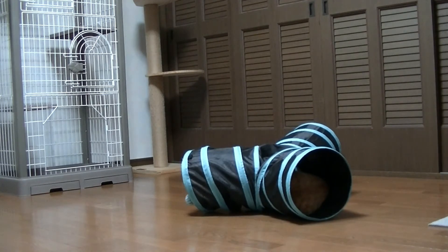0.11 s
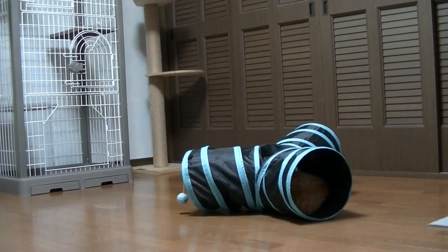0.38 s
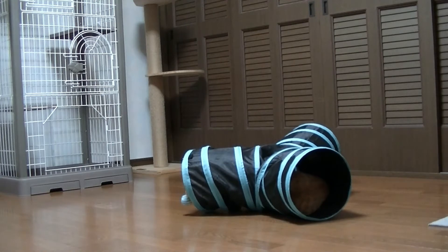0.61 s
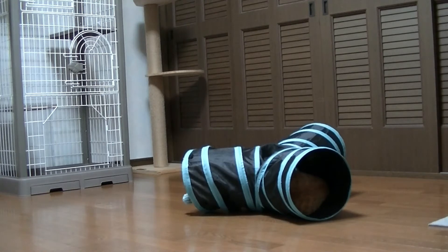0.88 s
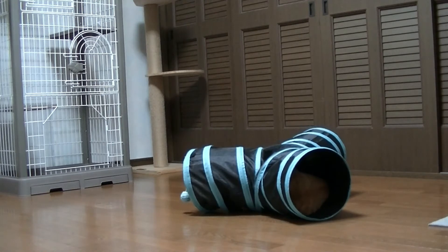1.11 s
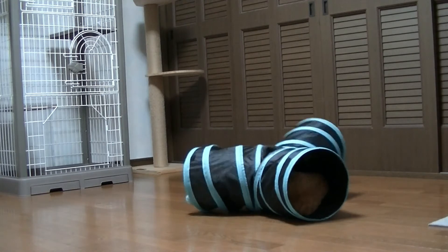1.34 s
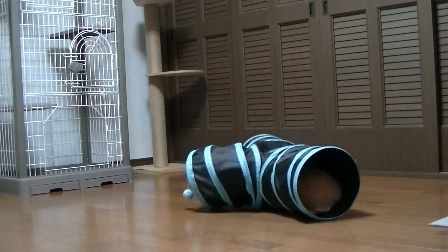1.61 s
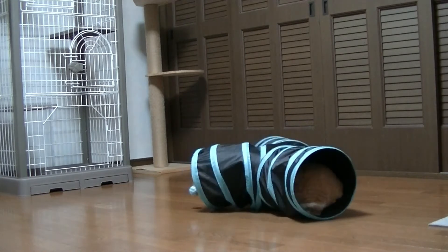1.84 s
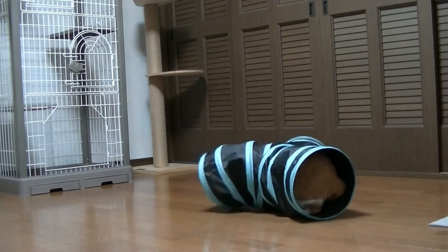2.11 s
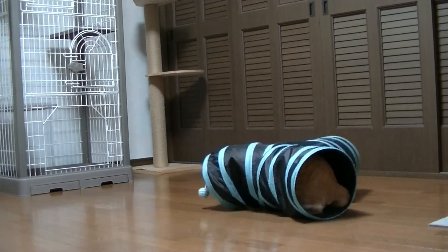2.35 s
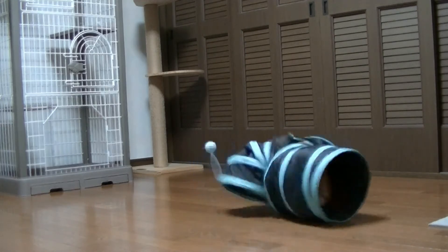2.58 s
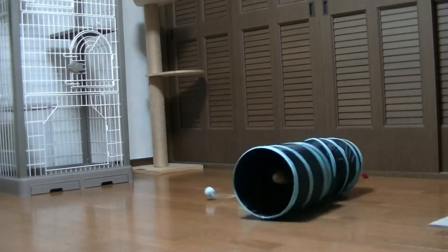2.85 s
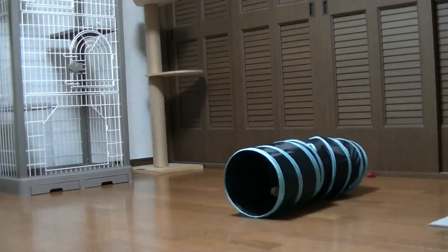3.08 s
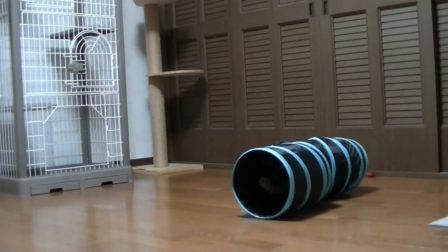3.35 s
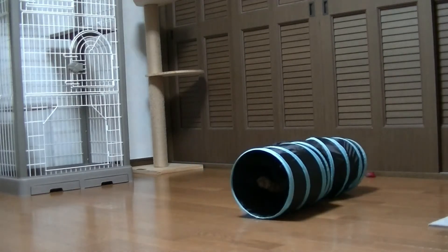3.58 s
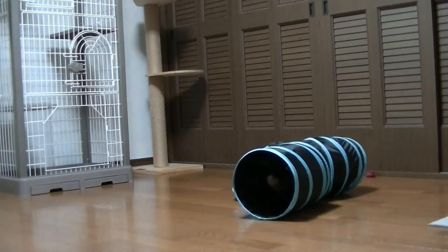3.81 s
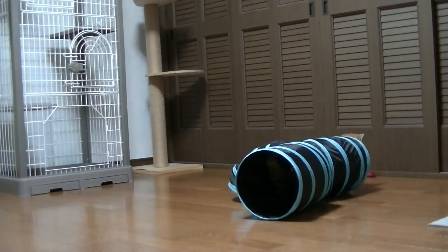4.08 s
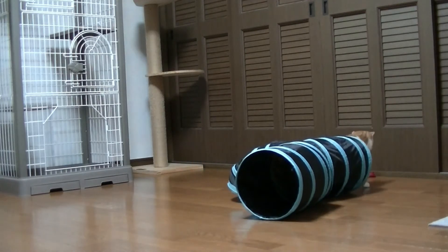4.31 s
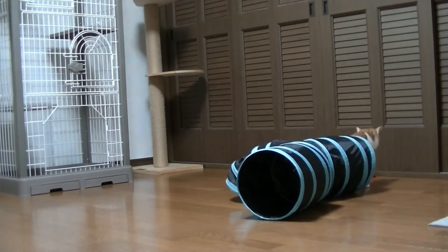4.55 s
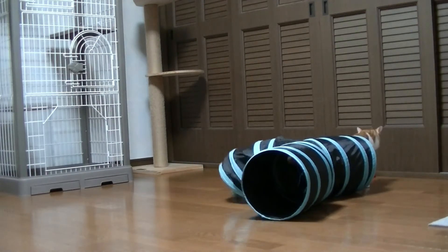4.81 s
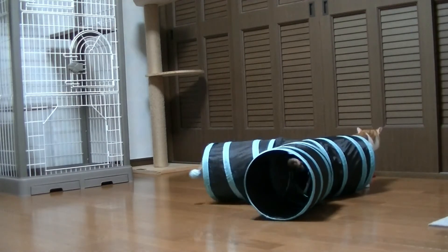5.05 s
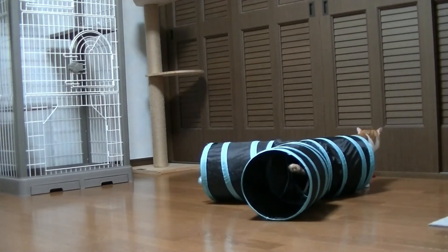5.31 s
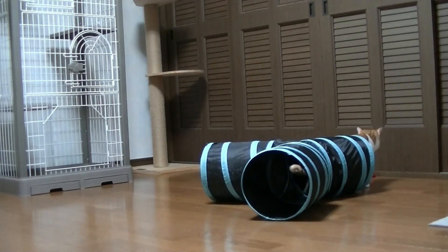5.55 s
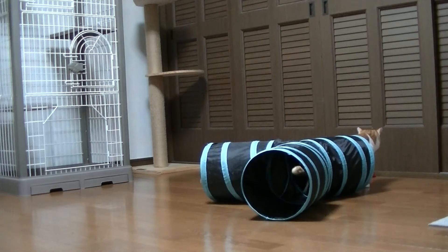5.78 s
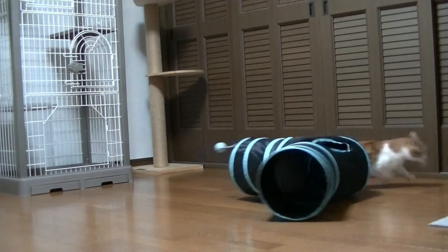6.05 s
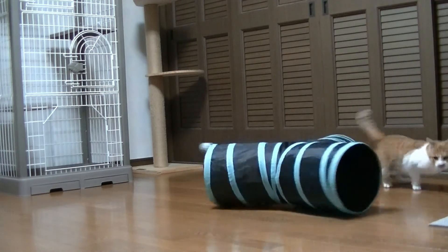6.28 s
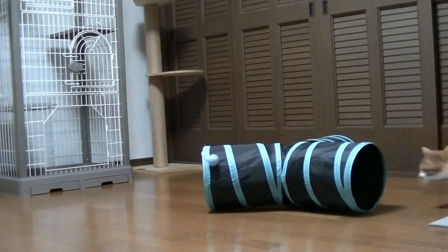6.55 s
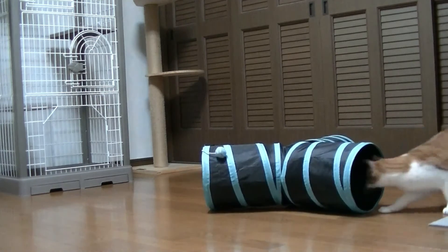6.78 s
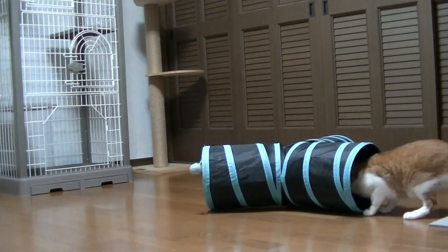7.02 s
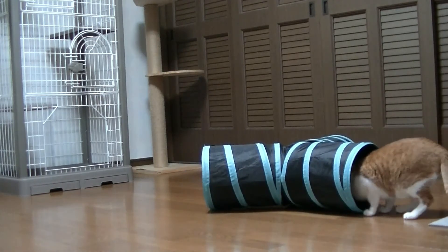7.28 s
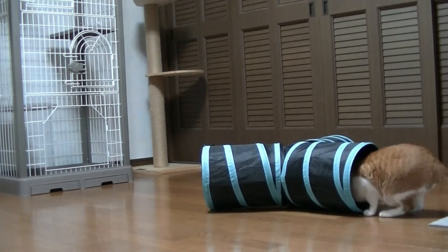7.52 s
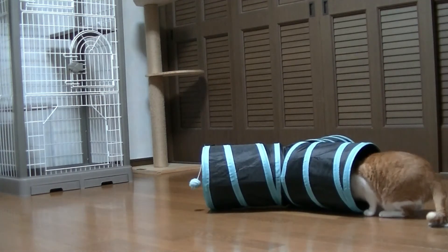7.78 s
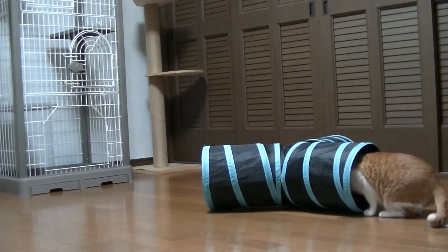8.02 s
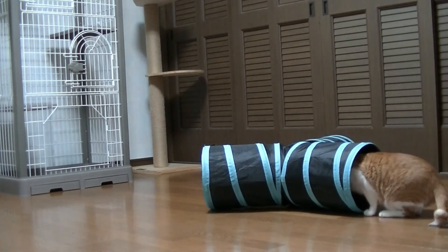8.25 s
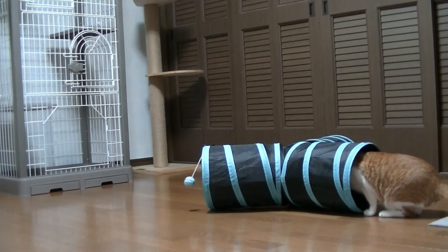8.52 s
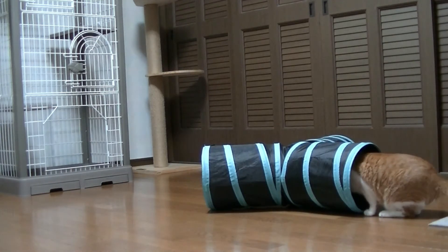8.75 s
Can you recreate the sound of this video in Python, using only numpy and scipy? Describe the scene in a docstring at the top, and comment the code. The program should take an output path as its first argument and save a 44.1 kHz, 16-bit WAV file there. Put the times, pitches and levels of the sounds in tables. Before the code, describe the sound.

A crinkly nylon tunnel rustles and scrapes over a wooden floor as a cat scrambles inside, with hard knocks, then faint ticks and quiet.

```python
"""Crinkling cloth comes first: a cat scrambles in a nylon play tunnel and shoves it over a wooden floor.
Many tiny random slips make the cloth hiss, the hoops scrape and the wall drum; short sine ticks are snapping creases.
Fading sine waves make the knocks and thumps on the boards, and a tiny bell that shimmers faintly as the cat walks.
A bare, lively room answers with tails of fading noise, over steady hiss and a low hum.
Two microphones listen from floor height."""
import sys
import numpy as np
from scipy import signal
from scipy.fft import rfft, irfft, next_fast_len
from scipy.io import wavfile
from scipy.ndimage import uniform_filter1d, minimum_filter1d, map_coordinates

SR = 44100
rng = np.random.default_rng(int(sys.argv[2]) if len(sys.argv) > 2 else 0)


def volts_from_decibels(level):
    """Turn decibel levels (scalar or array-like) into linear amplitude factors."""
    exponent = np.asarray(level, float) / 20
    return 10 ** exponent


def transcribe(signal):
    """Save signal, clipped to [-1, 1], as a 16-bit WAV file at the path in sys.argv[1]."""
    frames = np.atleast_2d(signal).T
    limited = np.clip(frames, -1, 1)
    pcm = np.round(limited * 32767).astype(np.int16)
    wavfile.write(sys.argv[1], SR, pcm)


N = 391608  # length in samples

# Tone of crisp crackles. Each row: pitch in Hz, relative level in dB.
CRISP_TONE = [(3500, -43.5), (5200, 4), (6000, 6.5), (8500, 3), (11000, -6.5), (15500, -26)]
# Tone of dull patter and cracks. Each row: pitch in Hz, relative level in dB.
DULL_TONE = [(700, -42.5), (1700, -2), (2300, 1), (3500, 1), (5000, -22.5)]
# How alike left and right are for the wide tunnel and the room. Each row: pitch in Hz, likeness (1 = the same).
WIDE_ALIKE = [(60, 0.99), (150, 0.99), (380, 0.98), (950, 0.95), (2380, 0.93), (5980, 0.69), (15000, 0.11)]
# Hoops and paws knocking the boards. Each row: start in seconds, level in dB before the modes' own levels,
# pitch that rings most in Hz, loss away from that pitch in dB per octave.
BLOWS = [(.37, -46, 990, 13), (.846, -47, 200, 16), (1.352, -38.5, 200, 2.5), (1.376, -30.5, 1605, 3.5),
         (1.408, -30.5, 697, -2), (1.624, -29, 800, 0.6), (2.455, -26, 600, 1.5), (2.614, -23, 252, 6.5),
         (2.7543, -9, 1300, 8), (2.778, -15, 900, 5), (2.809, -22, 752, 14), (2.843, -37, 1123, 17.5),
         (2.924, -20.5, 1290, 3), (3.972, -34, 2000, 10), (5.057, -32, 663, 4), (5.095, -48, 500, 8),
         (5.99, -31, 160, 5.5), (6.031, -22.5, 160, 6), (6.095, -27.5, 160, 2), (6.313, -18, 616, 7.5),
         (6.579, -36.5, 220, 2.5), (6.706, -37, 2300, 9), (6.862, -50, 800, 12), (6.875, -37.5, 810, 12),
         (6.885, -50, 1750, 14), (6.894, -39, 690, 19), (6.934, -44.5, 700, 5), (7.065, -43.5, 1600, 5.5),
         (7.095, -44, 1800, 13), (7.366, -45, 400, 4), (7.828, -58, 697, 7), (7.908, -48, 880, 15),
         (7.928, -50, 764, 22), (8.256, -53.5, 450, 9), (8.648, -57, 1150, 9)]


def tunnel():
    """Folds crinkle, sliding fur adds a sheen, hoops scrape the floor and the stretched wall drums."""
    # Tone of each part of the sound. Each row: pitch in Hz, relative level in dB per Hz.
    crinkle_tone = [(800, -30), (2200, -3.5), (3000, -1.5), (4000, -2.5), (5500, -2), (8000, -5.5),
                    (10000, -11.5), (14000, -31)]
    sheen_tone = [(5500, -19.5), (9500, -1), (11000, -1), (14500, -9.5), (15900, -13)]
    scrape_tone = [(200, -32.5), (420, -6), (650, -0.5), (1100, -2), (1600, -2), (2100, -3.5), (3000, -11),
                   (6000, -31)]
    drum_tone = [(41, -39), (70, -17.5), (91, -7.5), (118, -10.5), (161, -1.5), (241, -7.5), (296, -3),
                 (382, -1.5), (410, -2), (450, -1.5), (580, -32), (990, -120)]
    # The cat's restlessness under the single moves. Each row: time in seconds, level in dB before swing and mix.
    restlessness = [(0, -56), (.3, -66.5), (.55, -46.5), (.68, -60), (.94, -55), (1.12, -39.5),
                    (1.3, -42.5), (1.45, -28), (1.85, -23.5), (1.98, -45.5), (2.15, -31), (2.45, -32),
                    (2.6, -24.5), (2.95, -23), (3.2, -36), (3.3, -39), (3.5, -37), (3.75, -34.5),
                    (4.25, -37), (4.45, -35.5), (4.67, -39), (5.0, -40.5), (5.22, -32.5), (5.49, -62),
                    (5.6, -48.5), (5.74, -52), (5.89, -44), (6.0, -30.5), (6.36, -31.5), (6.45, -40),
                    (6.75, -40), (6.85, -66), (7.0, -54), (7.35, -77), (7.57, -76), (7.8, -59), (8.1, -71),
                    (8.88, -72)]
    # Shoves and lunges, levels before the mix. Each row: time of full strength in seconds, time held in seconds,
    # crinkle in dB, weight on the floor in dB over the crinkle, sheen of sliding fur in dB over the crinkle.
    shoves = [(0, 0.011, -38.5, -2.5, -8), (.2, 0.018, -54.5, -3, -5), (.59, 0.014, -41.5, -1.5, -6),
              (.71, 0.021, -43, 1.5, -4), (.81, 0.016, -44, -2, -5), (1.01, .02, -49, 5, -3),
              (1.06, .03, -56, 5, -7), (1.17, 0.027, -34.5, -8, -3), (1.378, 0.042, -28, 4.5, -5),
              (1.43, 0.11, -24.5, -3, -2.5), (1.63, 0.073, -20.5, -6, -7.5), (1.81, 0.036, -23, -6, 0),
              (1.84, 0.065, -19, -3.5, -5), (2.05, .05, -32, -3.5, -2), (2.17, .02, -28.5, -4, -6.5),
              (2.208, 0.034, -18, -5.5, -3), (2.37, 0.035, -23, -4.5, -5.5), (2.468, 0.024, -19.5, 4.5, -2),
              (2.51, 0.069, -19.5, -5.5, -3), (2.6, 0.026, -13.5, -0.5, -3.5), (2.67, 0.023, -16, -1, -1.5),
              (2.725, 0.0071, -19, -9, -8), (2.775, 0.028, -28, 15, -15), (2.85, .04, -15, -4.5, -10),
              (2.92, 0.021, -20, 3, -5), (3.05, 0.042, -27, -9, -8), (3.345, .05, -32, -2.5, -8),
              (3.63, 0.018, -32.5, 1, -7), (3.81, 0.067, -29, 1, -7), (3.97, 0.028, -39, 3, -16),
              (4.118, 0.03, -25.5, -5.5, -7), (4.3, 0.18, -34.5, -3, -9), (4.479, 0.056, -26, -4, -7.5),
              (4.7, 0.19, -34.5, -2.5, -10), (4.92, 0.02, -40.5, 6, -13.5), (5.059, .03, -34, 6, -8),
              (5.13, 0.056, -33, -6, -4.5), (5.56, 0.03, -44.5, -12, -7), (5.775, .02, -45.5, -1.5, -8),
              (5.85, .03, -49.5, -2, -5), (5.951, 0.018, -18.5, -3, -3.5), (5.99, 0.13, -12.5, -2.5, -4.5),
              (6.15, 0.2, -16.5, -2, -7), (6.55, .01, -41, -18, -19), (6.63, .03, -40.5, -10.5, -26),
              (6.939, 0.013, -39, 1, -8), (7.05, 0.036, -44.5, -1, -16), (7.21, 0.011, -41.5, -2, -2),
              (7.4, .02, -55, -5, -14), (7.49, 0.022, -46.5, -4, -15), (7.86, .04, -63, 7, -12),
              (7.93, .02, -46.5, -2, -5.5), (8.269, 0.012, -50.5, -3.5, -12), (8.668, 0.009, -48.5, -6, 1)]

    t = np.arange(N) / SR
    effort_s, effort_db = np.transpose(restlessness)
    effort_db = np.interp(t, effort_s, effort_db) + 1.5 * wobble(14)  # random swing in dB

    def strength(power, extra_db):
        """Adds the restless effort to the power of single moves, given once a millisecond."""
        moving = np.interp(t * 1000, np.arange(len(power)), power)
        return np.sqrt(moving + volts_from_decibels(effort_db + extra_db) ** 2)

    s, held, db, weight_db, sheen_db = np.transpose(shoves)
    blow_s, *blow = np.transpose(BLOWS)
    empty = slack(t)  # with no body inside, the cloth presses and slides less
    crinkle = strength(gesture(s, held, db), 0)
    sheen = strength(gesture(s, held, db + sheen_db, fall=257), -6 - 15 * empty)
    # weight lands quickly, a blow almost at once
    press = strength(gesture(s, held, db + weight_db, rise=699.5), -12 * empty)
    struck_db = blow_db(200, *blow) + 1
    struck = strength(gesture(blow_s, 0.026, struck_db, rise=4000), -61)

    cloth = grains(crinkle_tone, rate=6000, spread_db=0.5, clump_db=1.0)
    shine = grains(sheen_tone, rate=7200, spread_db=3.5, clump_db=3.0)
    # sparse sharper crackles
    cloth += volts_from_decibels(-11.5) * grains(CRISP_TONE, rate=220, spread_db=2.5, clump_db=5.5)
    scrape = grains(scrape_tone, rate=4000, spread_db=1.5, clump_db=2.0)
    drum = grains(drum_tone, rate=900, spread_db=0.0, clump_db=3.0)

    # the wall drums with the weaker of crinkle and press, and with every blow
    drumming = np.hypot(volts_from_decibels(-13.5) * np.minimum(crinkle, press), struck)
    return crinkle * cloth + sheen * shine + press * scrape + drumming * drum


def grains(spectrum, rate, spread_db, clump_db):
    """Clumps of tiny slips of uneven size, rate a second, all over the cloth, heard through a spectrum; rms 1."""
    uneven_db = spread_db * np.minimum(rng.exponential(1, N), 4)
    size = volts_from_decibels(uneven_db + clump_db * wobble(20))
    slips = (rng.random(N) < rate / SR) * size * rng.standard_normal((2, N))
    return unit(coloured(spread(slips, WIDE_ALIKE), spectrum))


def gesture(s, held, db, fall=182.5, rise=418):
    """Power each millisecond of moves that rise fast, hold and let go; rise and fall in dB per second."""
    t = np.arange(N * 1000 // SR + 2)[:, None] / 1000
    rising_db = rise * (t - s)
    falling_db = -fall * (t - s - held)
    shape_db = np.minimum(0, np.minimum(rising_db, falling_db))
    return np.sum(volts_from_decibels(db + shape_db) ** 2, axis=1)


def slack(s):
    """True while the tunnel stands empty (times in seconds)."""
    return (s > 6.38) & (s < 7.8)


def snaps():
    """A crease gives way with a tick of a few cycles; the cloth patters on briefly, crisp above and dull below."""
    # Single creases and claw taps. Each row: start in seconds, tick peak in dB, tick pitch in Hz,
    # level of the crisp patter in dB before the mix.
    creases = [(.0423, -30, 8700, -63), (.12, -36, 6700, -58), (.1638, -38, 9400, -58),
               (.1955, -43, 9800, -69), (.2231, -44, 7800, -70), (.298, -44, 9600, -72),
               (.4136, -41, 9000, -61), (.4363, -31, 6200, -60), (0.502, -35, 8900, -67),
               (0.574, -36, 5500, -57), (.587, -22, 9200, -56), (.697, -30, 5200, -52),
               (.716, -29, 8450, -60), (0.7533, -40.5, 6900, -49), (0.805, -28, 4670, -48),
               (0.864, -34, 7800, -54), (0.991, -34, 10500, -56), (1.0347, -36, 6100, -57),
               (1.0876, -36, 5830, -57), (1.1134, -22, 6500, -48), (1.1517, -24, 9400, -53),
               (1.1833, -17.5, 8450, -46), (1.2066, -27, 8800, -56), (1.2608, -20, 8800, -60),
               (1.331, -25, 8800, -41), (2.0385, -16, 7200, -37.5), (2.755, -19, 4300, -32),
               (2.795, -16, 9000, -45), (2.843, -13, 4900, -36), (3.264, -18, 8200, -46),
               (3.4617, -20, 6000, -61), (3.8, -18, 8200, -41), (4.3187, -28, 7400, -41),
               (4.6522, -21, 5200, -55), (5.755, -34, 6500, -50.5), (6.595, -19, 6450, -31.5),
               (6.6876, -12, 7900, -44), (6.7014, -21, 7060, -58), (6.7093, -29, 4500, -45),
               (6.8581, -61, 6700, -54), (6.884, -37, 5300, -50), (6.9029, -30, 7900, -50),
               (6.925, -26, 6200, -46), (6.9969, -23, 5800, -46), (7.006, -22, 6300, -46),
               (7.016, -25, 6700, -40.5), (7.0635, -26, 7000, -47), (7.1965, -36, 7700, -50),
               (7.382, -40, 6400, -54.5), (7.487, -22, 8600, -38.5), (7.4964, -28, 7500, -45),
               (7.5186, -26, 6800, -46), (7.684, -33.5, 8100, -54), (7.9152, -39, 9000, -60),
               (7.9852, -46, 7300, -60), (8.257, -48, 7300, -53), (8.647, -36, 8430, -52.5)]
    t = np.arange(SR // 8) / SR
    ticks, patter = np.zeros((2, N + len(t)))
    fade_s = np.array([[.12], [.1]])  # time to fall 60 dB: crisp, dull
    swell = volts_from_decibels(-60 * t / fade_s) * (1 - np.exp(-t / 0.0026))
    # bring the first 20 ms of the swell to rms 1
    swell /= np.sqrt(np.mean(swell[:, :SR // 50] ** 2, axis=1, keepdims=True))
    for s, db, hz, crisp_db in creases:
        # lower ticks patter duller, an empty tunnel less so
        dull_db = crisp_db + 7.5 * np.log2(7000 / hz) - 16 * slack(s)
        tick = np.sin(2 * np.pi * hz * t) * np.exp(-t * hz / 1.4) * (1 - np.exp(-t * hz / .8))
        slips = rng.standard_normal((2, len(t))) * volts_from_decibels(3.5 * rng.standard_normal((2, len(t))))
        crisp = unit(coloured(slips[0], CRISP_TONE))
        dull = unit(coloured(slips[1], DULL_TONE))
        parts = np.array([crisp, dull]) * swell
        start = round(s * SR)
        ticks[start:][:len(t)] += volts_from_decibels(db) * tick / tick.max()
        patter[start:][:len(t)] += volts_from_decibels([crisp_db, dull_db]) @ parts
    return ticks[:N], patter[:N]


def knocks():
    """A blow rings the modes of boards and tube, each time at slightly new strengths, with a short crack on top."""
    # Boards and tube, in four groups: body, boom, hollow, clack.
    # Each row: pitch in Hz, level in dB over the blow, time to fall 60 dB in seconds.
    wood_modes = [
        [(309, 0, 0.16), (381, -2, 0.16), (439, 1, 0.11)],
        [(143.4, -6, 0.28), (161.5, 1.5, 0.18), (199, 0.5, 0.26)],
        [(525, -1, 0.15), (600, -1.5, 0.14), (678, -4, 0.13), (800, -3.5, 0.092), (891, -5, 0.14)],
        [(1120, -2.5, 0.055), (1352, -0.5, 0.076), (1479, -0.5, 0.061), (1742, -1, 0.063), (1860, 2, 0.06),
         (2040, -5, 0.042), (2430, -7, .04)],
    ]
    t = np.arange(SR // 3) / SR
    out = np.zeros(N + len(t))
    for s, *blow in BLOWS:
        ring = np.zeros(len(t))
        for group in wood_modes:
            for hz, level_db, t60 in group:
                db = blow_db(hz, *blow) + level_db + rng.normal(0, 2.0)
                onset = 1 - np.exp(-t * hz)
                ring += volts_from_decibels(db - 60 * t / t60) * np.sin(2 * np.pi * hz * t) * onset
        crack_noise = unit(coloured(rng.standard_normal(len(t)), DULL_TONE))
        crack = volts_from_decibels(blow_db(1600, *blow) + 7 - 60 * t / 0.012) * crack_noise
        out[round(s * SR):][:len(t)] += ring + crack
    return out[:N]


def blow_db(hz, db, best_hz, loss):
    """How strongly a knock drives a mode: its level changes with the distance from the best pitch."""
    return db - abs(loss * np.log2(hz / best_hz))


def thumps():
    """A soft blow sets a floor mode ringing."""
    # Deep blows on the floor. Each row: start in seconds, level in dB before the soft onset,
    # pitch in Hz, time to fall 60 dB in seconds.
    deep_blows = [(.85, -50, 110, .3), (1.36, -42, 120, .35), (3.08, -38, 45, 0.46), (3.625, -38, 50, 0.32),
                  (4.15, -42, 46, .35), (4.58, -47, 40, .35), (4.795, -45, 81, 0.63), (5.06, -38, 160, .3),
                  (5.93, -45, 98, .4), (6.05, -39, 70, .35), (6.6, -42, 95.4, 0.5),
                  (7.006, -42, 93.4, 0.42), (7.366, -41, 150, .2)]
    out, t = np.zeros(N + SR), np.arange(SR) / SR
    for s, db, hz, t60 in deep_blows:
        envelope = volts_from_decibels(db - 60 * t / t60) * (1 - np.exp(-t / .008))
        out[round(s * SR):][:SR] += envelope * np.sin(2 * np.pi * hz * t)
    return out[:N]


def bell():
    """Two close, unsteady partials of a very small bell, ringing on after each shake."""
    # Shakes of the bell. Each row: start in seconds, starting level in dB (rms).
    shakes = [(6.72, -73), (6.84, -72), (6.925, -65), (7.2, -67), (7.39, -74), (7.46, -72), (7.51, -70)]
    # The pitches of the two partials in Hz.
    partial_hz = [13250, 13420]
    t = np.arange(N) / SR
    ring = np.zeros(N)
    for hz in partial_hz:
        ring += volts_from_decibels(5.4 * wobble(40)) * np.sin(2 * np.pi * hz * t + 2.7 * wobble(90))
    strength = np.zeros(N)
    for s, db in shakes:
        strength += volts_from_decibels(db - 60 * abs(t - s) / 0.81) * (t > s)  # falls 60 dB in 0.81 s
    return strength * unit(ring)


def room(x):
    """Walls answer with a noise tail that swells over a few ms and fades, the high and low pitches at own speeds."""
    # How long the room rings. Each row: pitch in Hz, time to fall 60 dB in seconds.
    ring_time = [(100, 0.92), (500, 0.67), (2000, 0.8), (6000, 0.61), (14000, 0.47)]
    hop, length = SR // 16, SR * 5 // 9
    padded = np.pad(x, (hop, 2 * hop))
    out = np.zeros((2, N + 4 * hop + length))
    for start in range(0, N + hop, hop):
        # a fresh noise tail takes over sixteen times a second, so the ringing stays smooth
        hz, t, z = signal.stft(pair(length, WIDE_ALIKE), SR, nperseg=256)
        fade = volts_from_decibels(-60 * t / along(ring_time, hz)[:, None])
        tail = signal.istft(z * fade, SR, nperseg=256)[1][:, :length]
        tail *= 1 - np.exp(-np.arange(length) / SR / 0.0053)
        piece = padded[start:start + 2 * hop] * np.hanning(2 * hop)
        heard = signal.fftconvolve(piece[None], tail / np.linalg.norm(tail[0]), axes=1)
        out[:, start:start + heard.shape[1]] += heard
    return out[:, hop:hop + N]


def hush():
    """Steady room air and microphone hiss, made of shaped noise, with a low, wavering sine hum."""
    # Tone of the hiss. Each row: pitch in Hz, relative level in dB per Hz.
    hiss_tone = [(15, -41.5), (25, -13), (37, -8), (52, -17), (70, -6.5), (117, -6), (175, -7), (206, -5),
                 (325, -8.5), (393, -7), (772, -10.5), (837, -11.5), (1070, -13.5), (6520, -25.5),
                 (15900, -31)]
    # How alike the hiss is left and right. Each row: pitch in Hz, likeness (negative = opposed).
    hiss_alike = [(60, 0.2), (240, -0.49), (950, -0.46), (3770, -0.35), (15000, 0.12)]
    t = np.arange(N) / SR
    hum = volts_from_decibels(-77.5 + 3.1 * wobble(4.5)) * np.sin(2 * np.pi * 67 * t + 1.9 * wobble(6.6))
    return volts_from_decibels(-55.5) * unit(coloured(pair(N, hiss_alike), hiss_tone)) + hum


def unit(x):
    """Scaled to rms 1."""
    return x / np.sqrt(np.mean(x ** 2) + 1e-20)


def along(points, hz):
    """Reads a curve of (Hz, value) points on a log pitch axis."""
    f, v = np.transpose(points)
    return np.interp(np.log(hz + 1), np.log(f + 1), v)


def wobble(rate):
    """A smooth random curve with rate knots a second."""
    knots = rng.standard_normal(int(N * rate / SR) + 4)
    return map_coordinates(knots, [np.arange(N) * rate / SR])


def coloured(x, spectrum):
    """Filters x to this spectrum, with nothing sounding ahead of its cause."""
    m = 2 * next_fast_len(x.shape[-1] // 2 + 4096)
    gain = volts_from_decibels(along(spectrum, np.fft.rfftfreq(m, 1 / SR)))
    # folding the cepstrum (spectrum of the log gain) gives the filter its minimum phase
    cepstrum = irfft(np.log(gain + 1e-6), m)
    cepstrum[1:m // 2] *= 2
    cepstrum[m // 2 + 1:] = 0
    return irfft(rfft(x, m) * np.exp(rfft(cepstrum)), m)[..., :x.shape[-1]]


def pair(length, alike):
    """Two noises, left and right, partly alike."""
    return spread(rng.standard_normal((2, length)), alike)


def spread(mid_side, alike):
    """Mixes two signals into a left and right that agree as far as the alike curve says."""
    length = mid_side.shape[1]
    likeness = along(alike, np.fft.rfftfreq(length, 1 / SR))
    turn = np.arccos(np.clip(likeness, -1, 1)) / 2
    mid, side = irfft(rfft(mid_side) * [np.cos(turn), np.sin(turn)], length)
    return np.array([mid + side, mid - side])


def scene():
    """Direct sound, the room's answer and the steady hush."""
    cloth, (ticks, patter), wood = volts_from_decibels(-4.5) * tunnel(), snaps(), knocks()
    near = cloth + ticks + patter + wood + thumps() + bell()
    to_room = volts_from_decibels(-3.0) * cloth[0] + volts_from_decibels(-15.5) * ticks + volts_from_decibels(1) * patter + volts_from_decibels(-1.5) * wood
    return near + room(to_room) + hush()


def low_pass(x):
    """Removes everything above the highest recorded frequency."""
    return signal.sosfilt(signal.butter(12, 16690, fs=SR, output="sos"), x)


def record(dry):
    """The two microphones differ a little in colour; a limiter ducks the loudest peaks; the top treble is cut."""
    # Colour of the microphones. Each row: pitch in Hz, left minus right in dB.
    mic_lean = [(60, -1), (180, 0.0), (550, 0), (1650, 1.5), (4970, 0.0), (15000, 0.5)]
    # Upper edge of the sound. Each row: pitch in Hz, level in dB.
    band_edge = [(15500, 0), (15850, -3), (16050, -80)]
    left = coloured(dry[0], [(hz, db / 2) for hz, db in mic_lean])
    right = coloured(dry[1], [(hz, -db / 2) for hz, db in mic_lean])
    both = np.array([left, right])
    needed = np.minimum(1, .98 / (abs(both).max(0) + 1e-9))
    # the gain eases down just ahead of a peak and back up just after it
    gain = uniform_filter1d(minimum_filter1d(needed, size=265), size=133)
    mix = coloured(both * gain, band_edge)
    return low_pass(mix)


dry = scene()
out = record(dry)
transcribe(out)
```